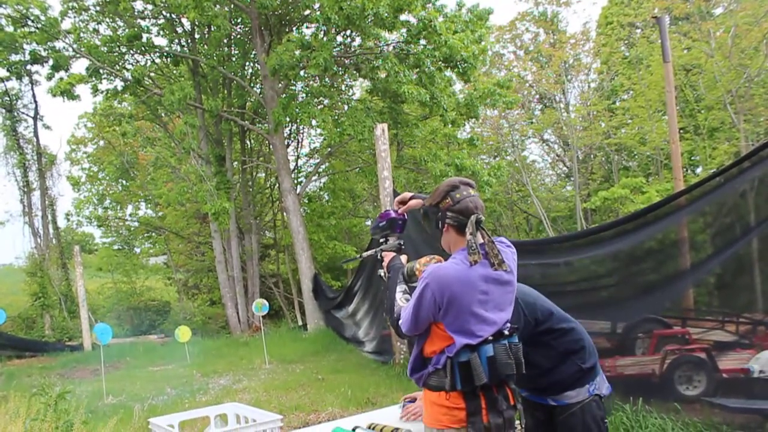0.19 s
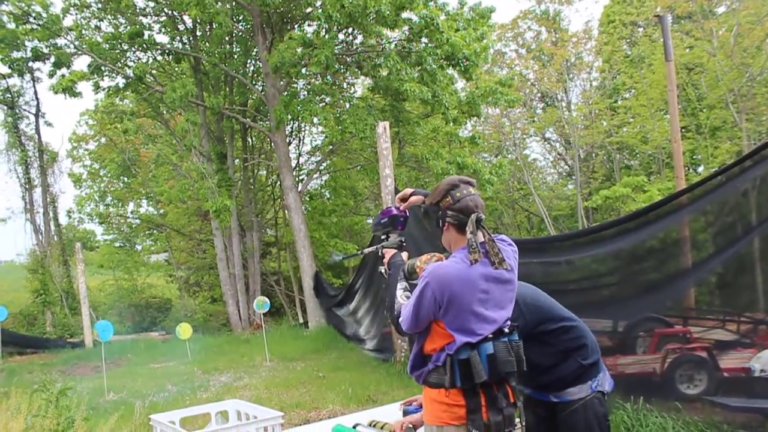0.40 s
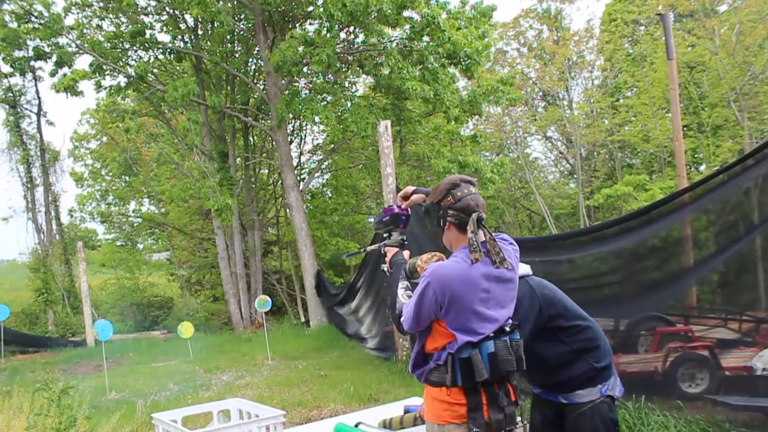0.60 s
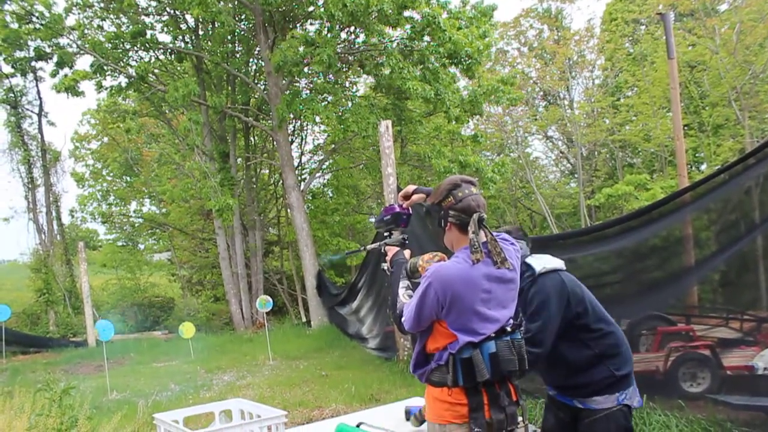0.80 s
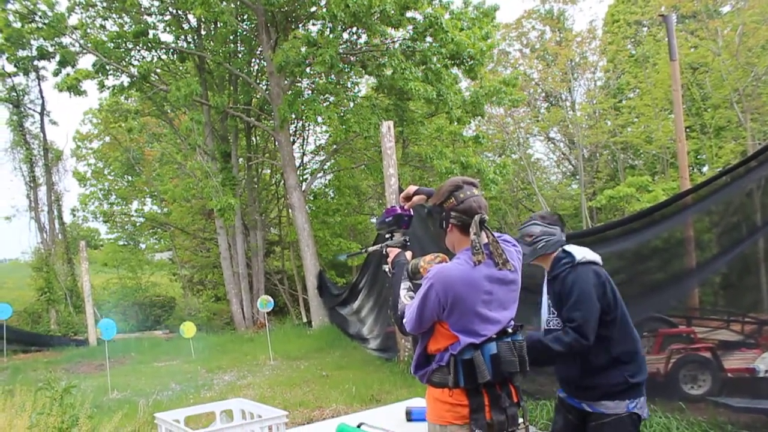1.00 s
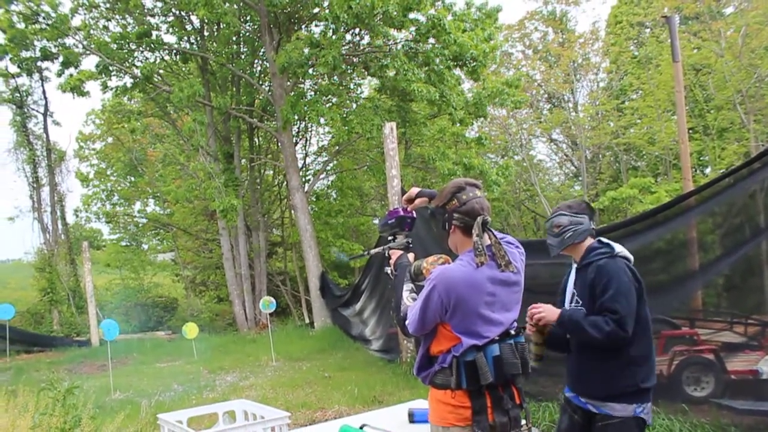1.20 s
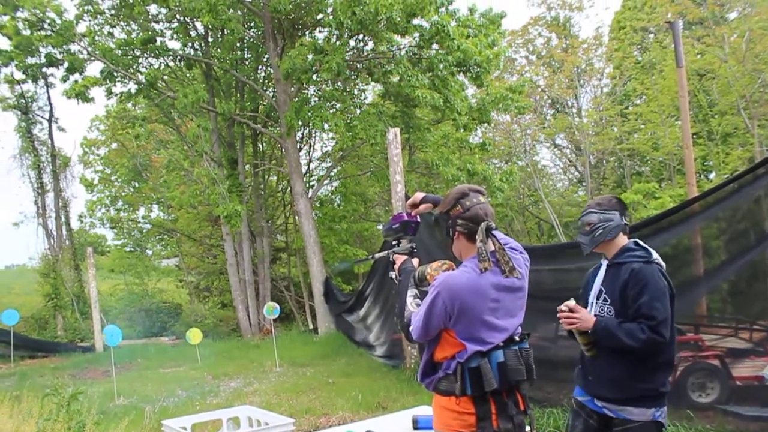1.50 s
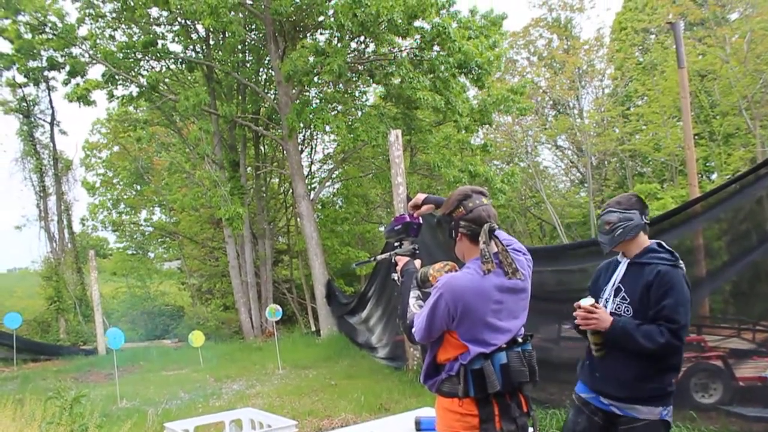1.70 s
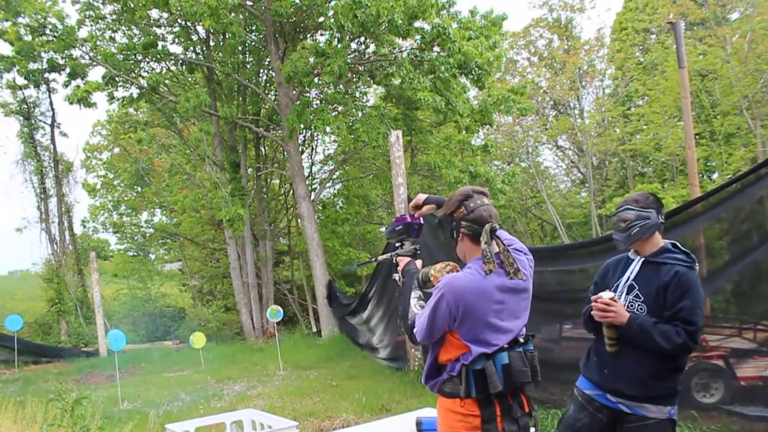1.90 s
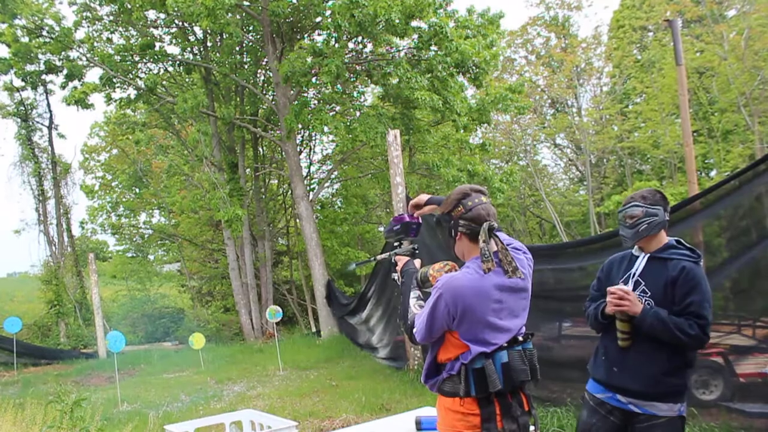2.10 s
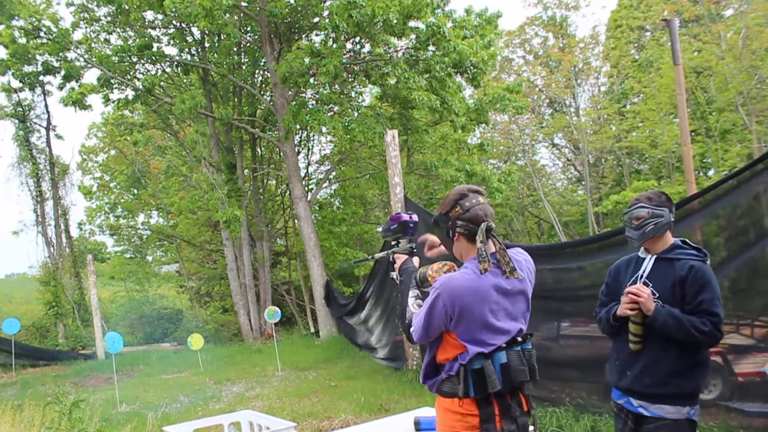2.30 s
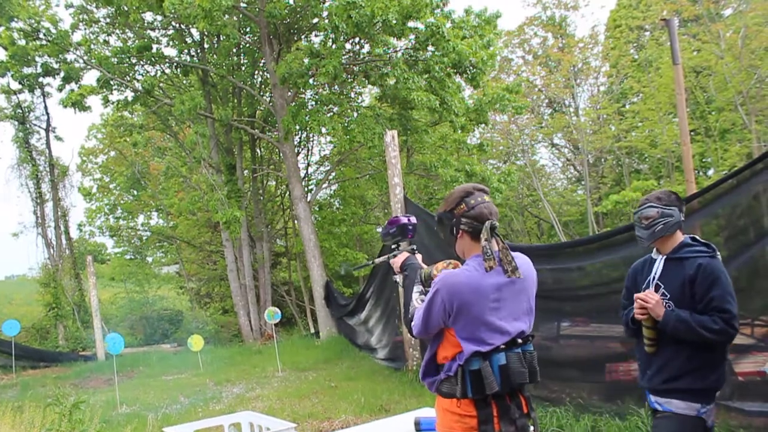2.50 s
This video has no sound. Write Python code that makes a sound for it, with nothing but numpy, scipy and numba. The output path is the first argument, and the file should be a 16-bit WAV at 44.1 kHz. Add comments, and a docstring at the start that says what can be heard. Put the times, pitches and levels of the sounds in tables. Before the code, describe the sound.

Paintball fire pops and hisses near the microphone at a wooded range: one shot with hollow handling knocks, a short rapid burst, then a longer one. Just after most shots, a ball smacks ringing sheet metal.

```python
"""A paintball marker fires one shot and two fast strings of shots on a wooded range.
Each shot is a pop and a hiss of gas that rings the marker's body and barrel. About an eighth of a
second after most shots, a ball bursts on a sheet metal target, which rings. Hollow knocks surround
the first shot, and the trees echo over a soft outdoor hush and a faint hum. The camera's gain control
turns the sound down after loud shots, and the loudest peaks are flattened."""
import sys
import numpy as np
from scipy import signal
from scipy.fft import rfft, irfft, next_fast_len
from scipy.io import wavfile
from numba import njit

SR = 44100
rng = np.random.default_rng(int(sys.argv[2]) if len(sys.argv) > 2 else 0)


def persist_wave(psi):
    """Save psi, clipped to +-1, as 16-bit WAV."""
    counts = np.round(np.clip(psi, -1, 1) * 32767).astype(np.int16)
    wavfile.write(sys.argv[1], SR, np.atleast_2d(counts).T)


N = 114660


def amp(db):
    return 10 ** (np.asarray(db) / 20)


def along(points, hz):
    """Read between (pitch_hz, value) points on a log pitch scale."""
    pitches, values = np.transpose(points)
    return np.interp(np.log(hz + 1), np.log(pitches + 1), values)


def filtered(x, response):
    """Scale and delay each frequency of x by response(hz)."""
    size = next_fast_len(x.shape[-1] + 8192)
    return irfft(rfft(x, size) * response(np.fft.rfftfreq(size, 1 / SR)), size)[..., :x.shape[-1]]


def noise(size, spectrum):
    """Noise of strength 1 (rms), shaped by (pitch_hz, level_db) points."""
    x = filtered(rng.standard_normal(size), lambda hz: amp(along(spectrum, hz)))
    return x / np.sqrt(np.mean(x ** 2) + 1e-20)


def burst(t, db, fade_s, brightness=1):
    """Fading noise; each step of brightness tilts it to the treble. A fade_s is the time to drop 60 dB."""
    return amp(db - 60 * t / fade_s) * np.diff(rng.standard_normal(len(t) + brightness), brightness)


def dying(x, fades):
    """Let each frequency die away at its own speed."""
    hz, t, bands = signal.stft(x, SR, nperseg=128)
    bands = bands * amp(-60 * t / along(fades, hz)[:, None])
    return signal.istft(bands, SR, nperseg=128)[1][..., :x.shape[-1]]


def ring(tones, t, scatter_db):
    """The fading tones of a struck object, each a little stronger or weaker at every blow."""
    hz, db, fade_s = np.transpose(tones)[:, :, None]
    db = db + scatter_db * rng.standard_normal(db.shape)
    return np.sum(amp(db - 60 * t / fade_s) * np.sin(2 * np.pi * hz * t), axis=0)


def add(out, start_s, sound):
    part = out[round(start_s * SR):][:len(sound)]
    part += sound[:len(part)]


# Tone of the outdoor hush: pitch_hz, level_db
HUSH_TONE = [(110, -8.5), (220, -11), (400, -14.5), (650, -6), (950, -10), (1500, -13), (4000, -24.5),
             (9000, -40), (16000, -39)]
# Loudness of a faint sound near 1 kHz: time_s, level_db
FAINT_LEVELS = [(0, -45), (.06, -60), (.21, -50), (2.46, -79), (2.52, -37), (2.6, -43)]
# Its narrow band of noise: pitch_hz, level_db
FAINT_TONE = [(700, -59), (900, 0), (1100, -3), (1400, -46)]

def air():
    """Outdoor hush with a faint, narrow sound that comes and goes."""
    faint_db = np.interp(np.arange(N) / SR, *np.transpose(FAINT_LEVELS))
    return amp(-50.5) * noise(N, HUSH_TONE) + amp(faint_db) * noise(N, FAINT_TONE)


def steady_hum(pitch_hz=656, fade_s=22):
    """A faint, nearly steady hum near 656 Hz sounds throughout."""
    t = np.arange(N) / SR
    return amp(-47 - 60 * t / fade_s) * np.sin(2 * np.pi * pitch_hz * t)


def puff(t, length_s):
    """A puff of gas: a jump in pressure, then suction."""
    age = np.maximum(t / length_s, 0)
    return (t >= 0) * np.e * age * (2 - age) * np.exp(-1.5 * age)


# The shots: start_s, blast_db, pop_db (the valve's pop, relative to the blast)
SHOTS = [(0.2388, 14.5, 2), (0.585, 5.5, -1), (0.6651, 7.5, 1), (0.7453, 7.5, -6.5), (0.8248, 7.5, -2),
         (.9044, 3.5, 1), (.9842, 6.5, -4), (1.064, 10, -9), (1.2848, 7.5, 1.5), (1.3638, 3.5, 0),
         (1.444, 4.5, 0.5), (1.5236, 2.5, -21), (1.6034, 1, -1), (1.6838, 5.5, -0.5), (1.7638, 3.5, 2),
         (1.842, 6.5, -7), (1.9228, 2, 5), (2.0028, 3, -50), (2.0826, 5, 2), (2.1628, 6.5, 3.5),
         (2.2428, 9.5, 5), (2.323, 10, 1)]
# Gas puffs after each pop: delay_s, level_db, length_s
GAS_PUFFS = [(.0026, 2.5, 0.00011), (.0032, -2.5, 0.00011), (.0037, -3.5, 0.000081), (.0045, 4.5, 0.00019),
             (.0049, 13.5, .00007), (.0081, -4, 0.00041), (0.0193, -2.5, .00008)]
# Tone of the escaping gas: pitch_hz, level_db
HISS_TONE = [(100, -21.5), (230, 5), (400, -2.5), (650, -2), (1500, 4), (3000, -0.5), (5000, -7.5),
             (9000, -13.5), (16000, -72)]
# Where the body and barrel ring: pitch_hz, width_hz, level_db
BODY_TONES = [(207, 65, 0), (290.2, 26, -3), (633, 48.6, 5.5), (995, 68.5, 4.5), (1557, 69, 8),
              (1668, 19.5, 6), (2530, 760, -3.5), (4190, 1050, 0.5), (6760, 900, 0)]

def marker(repeat_share=0.46):
    """The solenoid (an electric switch) puffs, the valve pops, gas rushes out and the bolt ticks."""
    pops, hiss = np.zeros(N), np.zeros(N)
    t = np.arange(SR // 10) / SR
    same_hiss = np.sqrt(repeat_share) * noise(len(t), HISS_TONE)  # alike in every shot
    # The hiss holds for 18 ms, fades, then fades faster from 37 ms on.
    fading_db = -16.5 - 60 * (t - 0.018) / 0.075 - 60 * np.maximum(t - 0.037, 0) / 0.037
    hiss_shape = amp(np.where(t < 0.018, -12.5, fading_db))
    for start_s, blast_db, pop_db in SHOTS:
        gas = amp(pop_db) * puff(t, length_s=0.00044)
        for delay_s, puff_db, length_s in GAS_PUFFS:
            gas += amp(puff_db + rng.normal(0, 1.2)) * puff(t - delay_s, length_s)
        add(pops, start_s, amp(blast_db) * gas)
        fresh_hiss = np.sqrt(1 - repeat_share) * noise(len(t), HISS_TONE)
        add(hiss, start_s - 0.001, amp(blast_db) * hiss_shape * (same_hiss + fresh_hiss))
        add(hiss, start_s - 0.001, burst(t, blast_db - 20, fade_s=0.1))  # bright fizz
        add(hiss, start_s - 0.0215, burst(t, -22, fade_s=0.1))  # solenoid
        add(hiss, start_s + 0.013, burst(t, blast_db - 14, fade_s=0.0058, brightness=2))  # bolt

    def body(hz):
        return sum(amp(db) * 1j * hz * width / (pitch ** 2 - hz ** 2 + 1j * hz * width)
                   for pitch, width, db in BODY_TONES)
    return hiss + amp(5) * filtered(pops, body)


# Knocks around the first shot: start_s, level_db, rise_s
KNOCKS = [(0.2178, -1, 0.011), (0.2972, -7.5, 0.0021), (.327, -11.5, 0.0014)]
# Their hollow ring: pitch_hz, level_db, fade_s
HOLLOW_TONES = [(597.5, 6.5, 0.077), (278, -3.5, 0.16), (187, -5, 0.098)]
# Their rattle: pitch_hz, level_db
RATTLE_TONE = [(80, -2), (250, 6.5), (600, 0), (1500, -4), (4000, -17.5), (16000, -30)]

def knocks():
    """Handling knocks near the shooters: a hollow ring with a noisy rattle."""
    out, t = np.zeros(N), np.arange(SR // 5) / SR
    for start_s, level_db, rise_s in KNOCKS:
        rattle = amp(0.5 - 60 * t / 0.17) * noise(len(t), RATTLE_TONE)
        hollow = ring(HOLLOW_TONES, t, scatter_db=1.5)
        rise = 1 - np.exp(-t / rise_s)
        add(out, start_s, amp(level_db) * (hollow + rattle) * rise)
    return out


# Balls landing: start_s, splat_db, six group_db (one per group of sheet tones), chime_hz, chime_db
HITS = [(0.368, 1.5, -14, -46, -21.5, -48, -7, -17.5, 4550, -2.5),
        (0.712, -5, -15.5, -18, -14.5, -17, -24, -32, 5054, -10),
        (0.797, -11.5, -27, -42, -29, -32, -13.5, -40, 3250, -6),
        (0.952, -9, -28, -26, -16, -33, -10.5, -22, 3440, -32),
        (1.037, -9, -17.5, -44, -39, -42, -1.5, -13.5, 3260, -17),
        (1.113, -5, -17, -32, -11.5, -12, -37, -45, 4540, -4),
        (1.19, -7.5, -16, -40, -16.5, -20, -11, -41, 5320, -32),
        (1.421, -9, -25.5, -42, -27.5, -48, -29, -37, 6600, -22),
        (1.494, -10.5, -20.5, -40, -23, -49, -42, -27, 3780, -31),
        (1.569, -12, -59, -21, -24, -32, -13, -47, 5190, -9),
        (1.65, -12, -19, -14, -38, -17.5, -13, -27, 5110, -13),
        (1.734, -10, -20, -12.5, -42, -27, -17, -42, 4860, -24),
        (1.809, -6, -42, -43, -41, -28, -14, -42, 4340, -16),
        (1.895, -11, -32, -32, -23, -39, -18, -38, 3780, -29),
        (1.963, -5.5, -21, -23, -24, -38, -11, -44, 5480, -28),
        (2.059, -10.5, -24.5, -12, -26, -17.5, -19, -42, 6130, -10),
        (2.132, -8.5, -21, -15.5, -26, -31, -12, -32, 3680, -31),
        (2.213, -4.5, -20, -10, -30, -16, -11, -40, 5190, -9.5),
        (2.296, -3.5, -23, -7, -14, -27, -17, -23, 4410, -33),
        (2.376, -12, -21, -35, -34, -22, -33, -31.5, 6010, -45)]
# The sheet's tones, one row per group that rings together: pitch_hz of each tone
SHEET_PITCHES = [
    [655, 641, 506],
    [1679, 2390, 3100],
    [1825, 1520, 2805],
    [2579, 829],
    [2748],
    [1071, 1384, 1520],
]
# The same groups: (level_db, fade_s) of each tone
SHEET_RINGS = [
    [(4, 0.71), (-9, 0.48), (-8, 1)],
    [(7, 0.18), (-1.5, 0.16), (-2.5, 0.27)],
    [(9, 0.18), (-0.5, 0.32), (-4, 0.59)],
    [(7.5, 0.23), (-0.5, 0.4)],
    [(3, 0.31)],
    [(0.5, 0.53), (-13, 0.88), (1, 0.44)],
]
# The splat, a dense wash of high ringing: pitch_hz, level_db
SPLAT_TONE = [(180, -29), (300, -12.5), (701, 0.5), (2000, 0), (2740, 6), (3350, -1), (4700, -2),
              (10000, -13.5), (16000, -24)]
# How fast the splat dies: pitch_hz, fade_s
SPLAT_FADES = [(500, 0.2), (3000, 0.19), (10000, 0.2), (14000, 0.05)]

def target(side_chimes=40, spread_octaves=0.4, chime_fade_s=0.05, bass_cut_hz=400):
    """Each ball cracks, splats and rings the metal sheet; the spot it hits decides which tones are loud."""
    out, t = np.zeros(N), np.arange(SR) / SR
    short_t = t[:SR // 2]
    for start_s, splat_db, *group_dbs, chime_hz, chime_db in HITS:
        sheet_tones = [(hz, tone_db + group_db, fade_s)
                       for group_db, pitches, rings in zip(group_dbs, SHEET_PITCHES, SHEET_RINGS)
                       for hz, (tone_db, fade_s) in zip(pitches, rings)]
        # One brief chime, with many more scattered around its pitch.
        side_hz = chime_hz * 2 ** (spread_octaves * rng.standard_normal(side_chimes))
        chime_tones = [(chime_hz, chime_db, chime_fade_s)] + [(hz, -21, chime_fade_s) for hz in side_hz]
        splat = amp(-8) * dying(noise(len(short_t), SPLAT_TONE), SPLAT_FADES)
        crack = burst(short_t, -1.5, fade_s=0.013)
        strike_s = start_s + 0.0012
        add(out, strike_s, ring(sheet_tones, t, scatter_db=1.5))
        chimes = ring(chime_tones, short_t, scatter_db=4)
        add(out, strike_s, amp(splat_db + 7) * (splat + crack + chimes))
    return filtered(out, lambda hz: bass_cut(hz, bass_cut_hz, damping=1.2))


# Ticks near the end: start_s, level_db
TICKS = [(2.563, -49), (2.5682, -39.5)]

def ticks():
    """Two small, dry handling ticks, almost at once."""
    out, t = np.zeros(N), np.arange(SR // 5) / SR
    for start_s, level_db in TICKS:
        add(out, start_s, burst(t, level_db + 10.5, fade_s=0.023, brightness=0))
    return out


# How fast the echo dies: pitch_hz, fade_s
ECHO_FADES = [(200, 0.3), (500, 0.65), (1500, 0.39), (6000, 0.39), (14000, 0.24)]

def tree_echo(x, delay_s=0.012):
    """Sound bounces off trunks and netting and comes back as a blur."""
    tail = dying(rng.standard_normal(SR // 2), ECHO_FADES)
    tail = np.pad(tail / np.linalg.norm(tail), (round(delay_s * SR), 0))
    return signal.fftconvolve(x, tail)[:N]


def scene():
    """All the sounds and their echo, in one channel."""
    direct = steady_hum() + marker() + target() + knocks() + ticks()
    return (direct + amp(-17) * tree_echo(direct) + air())[None]


def bass_cut(hz, corner_hz, damping):
    """A filter that steeply weakens everything below corner_hz."""
    return (hz ** 2 / (hz ** 2 - corner_hz ** 2 - 1j * damping * hz * corner_hz)) ** 2


@njit
def follow(x, rise_s, fall_s):
    """Track a level, rising and falling at different speeds."""
    levels, level = np.empty_like(x), 0.
    for i in range(len(x)):
        level += (x[i] - level) / (SR * (rise_s if x[i] > level else fall_s))
        levels[i] = level
    return levels


def gain_control(x, limit_db=-24, strength=0.75, lag_s=0.0091):
    """Turn the sound down just after it passes the limit, then let it come back."""
    level_db = 20 * np.log10(follow(np.abs(x[0]), rise_s=0.0021, fall_s=0.064) + 1e-6)
    excess_db = np.maximum(level_db - limit_db, 0)
    step = 1 / (lag_s * SR)
    dip_db = signal.lfilter([step], [1, step - 1], strength * excess_db)
    return x * amp(-dip_db)


# Low noise of the microphone's amplifier: pitch_hz, level_db
RUMBLE_TONE = [(150, -4), (240, -27)]

def record(dry, hardness=9):
    """The microphone thins the bass; then come gain control, rumble, flattened peaks and a treble cut."""
    bass_leak = lambda hz: amp(-2) / (1 + 1j * hz / 112) ** 2  # some deep bass still gets through
    x = filtered(dry, lambda hz: bass_cut(hz, corner_hz=147, damping=1.4) + bass_leak(hz))
    x = gain_control(x) + amp(-62) * noise(N, RUMBLE_TONE)
    x = x / (1 + np.abs(x) ** hardness) ** (1 / hardness)  # flatten the loudest peaks
    return filtered(x, lambda hz: (hz < 15900) / (1 + (hz / 14300) ** 6))


dry = scene()
out = record(dry)
persist_wave(out)
```